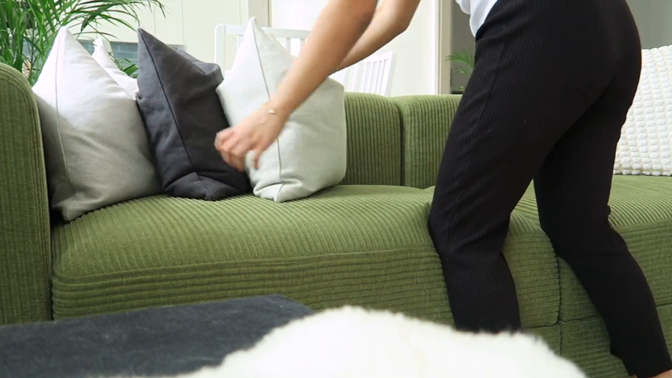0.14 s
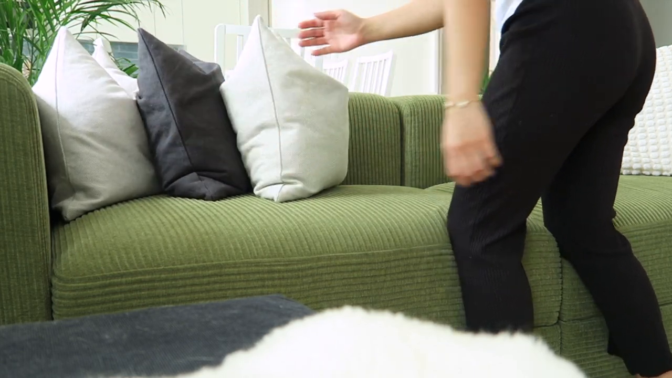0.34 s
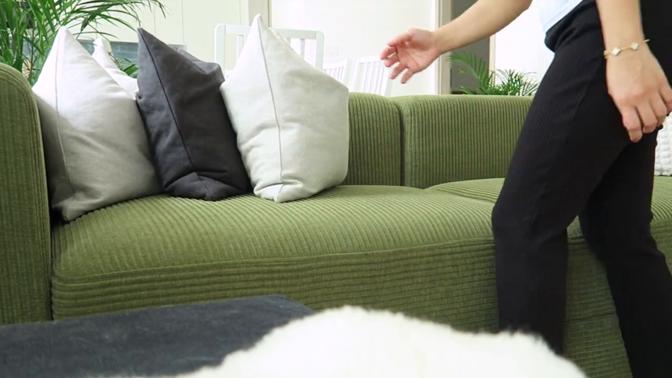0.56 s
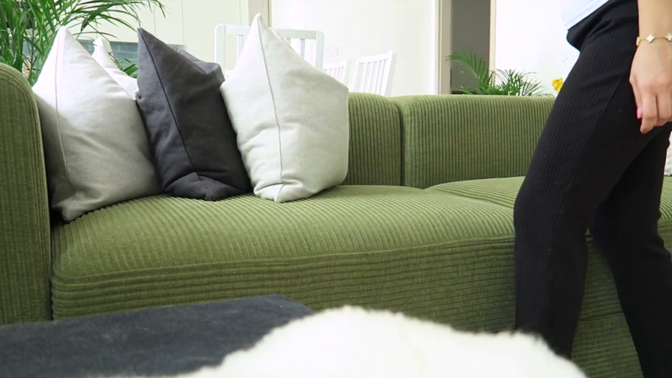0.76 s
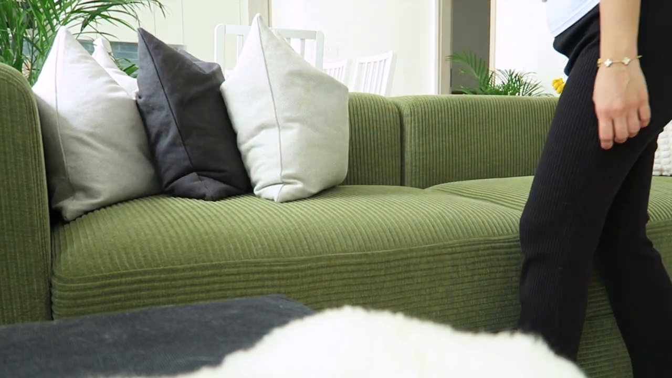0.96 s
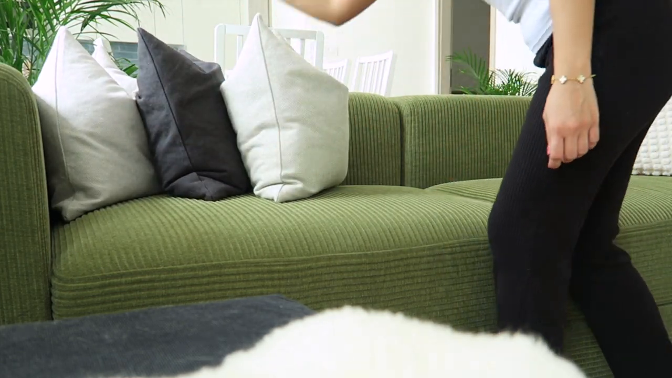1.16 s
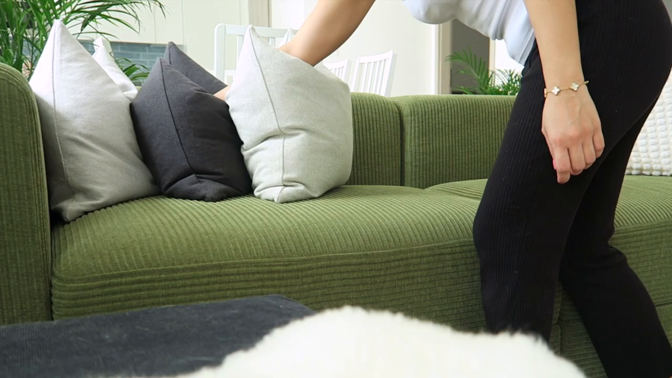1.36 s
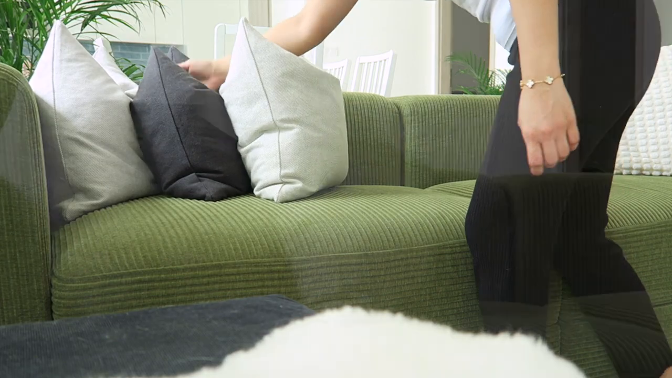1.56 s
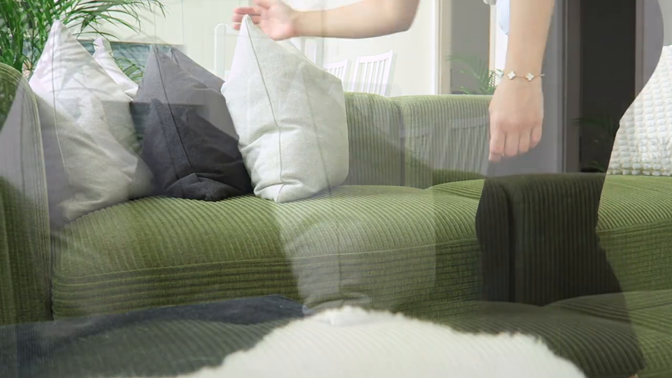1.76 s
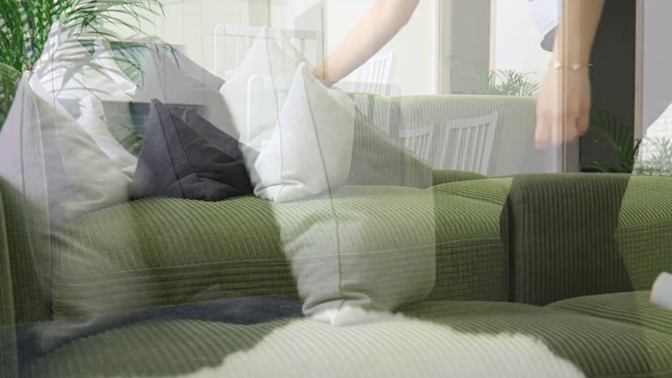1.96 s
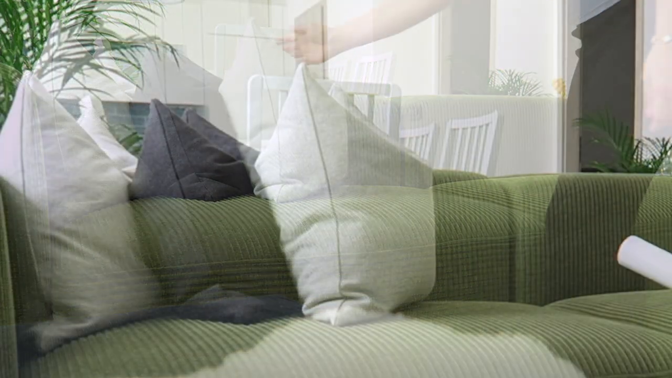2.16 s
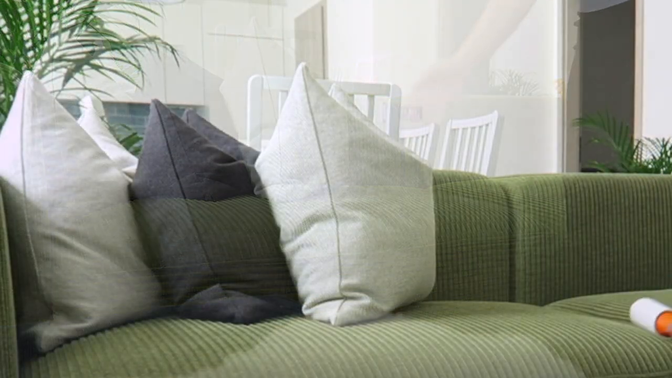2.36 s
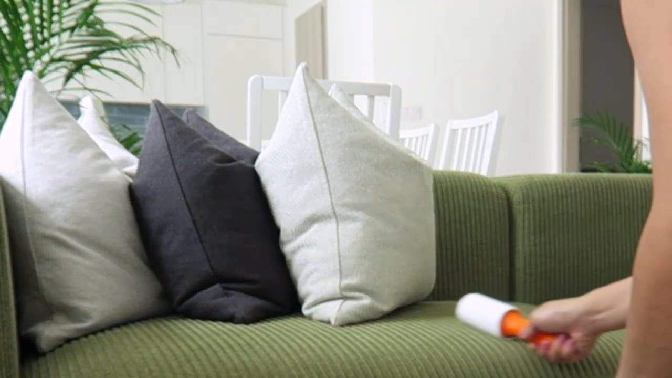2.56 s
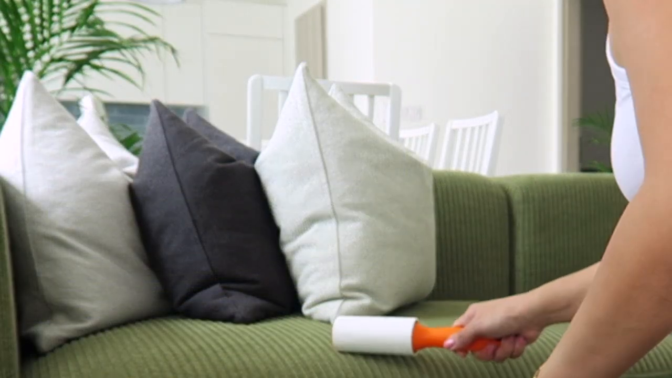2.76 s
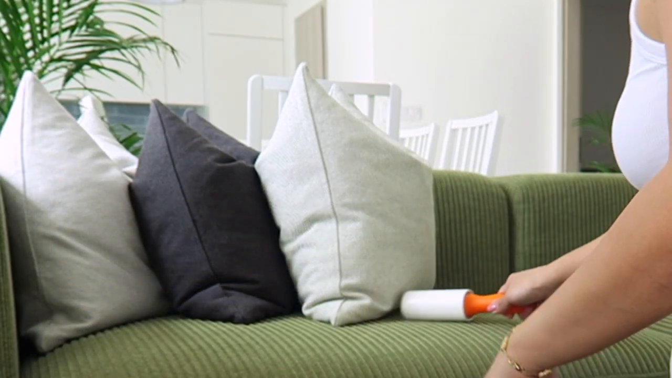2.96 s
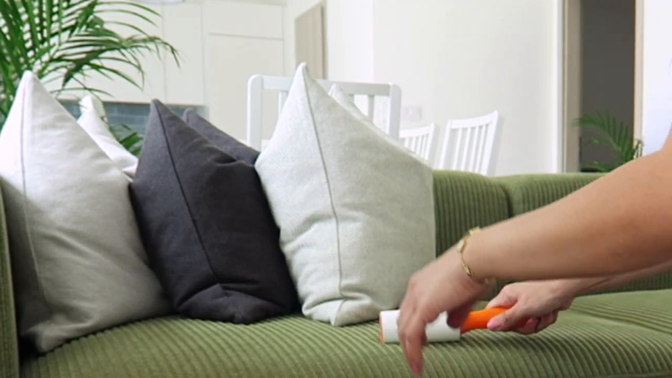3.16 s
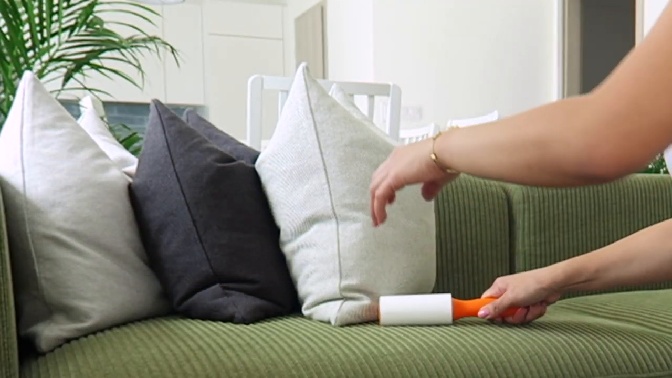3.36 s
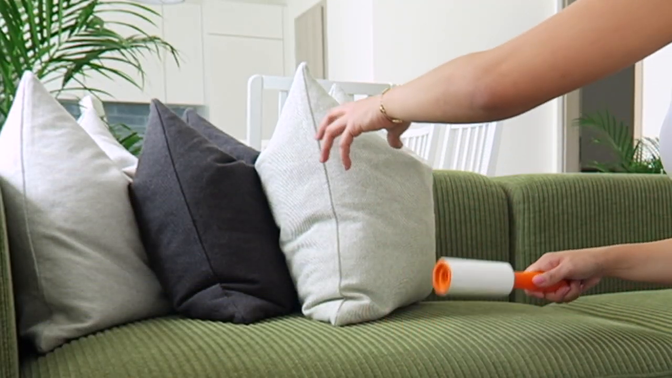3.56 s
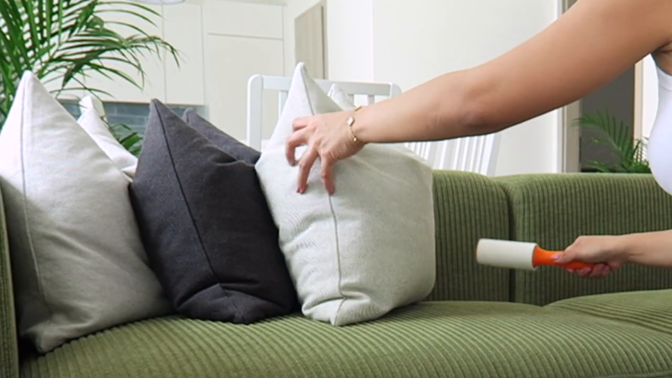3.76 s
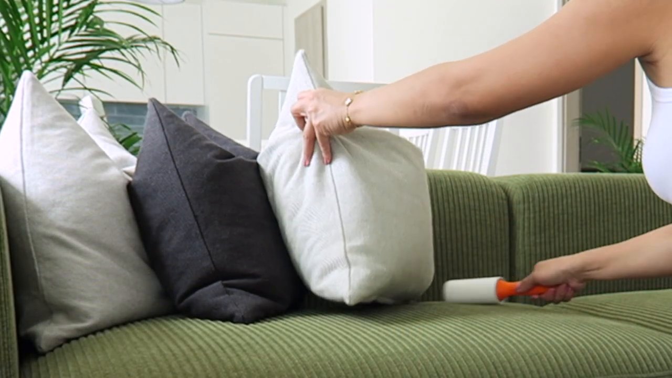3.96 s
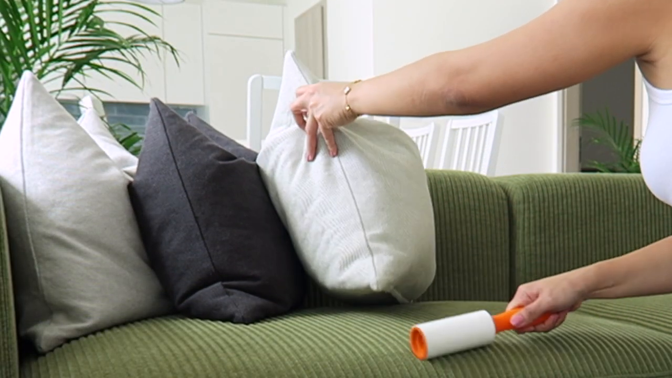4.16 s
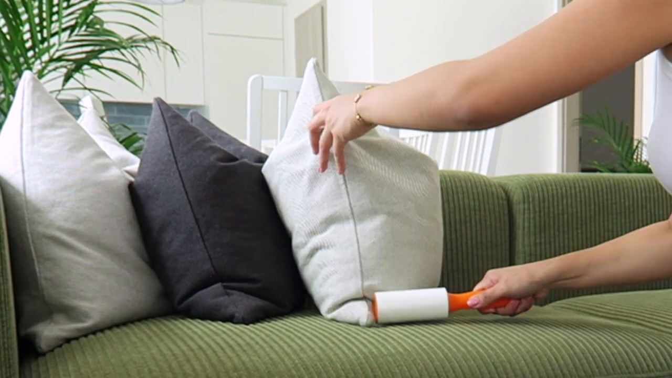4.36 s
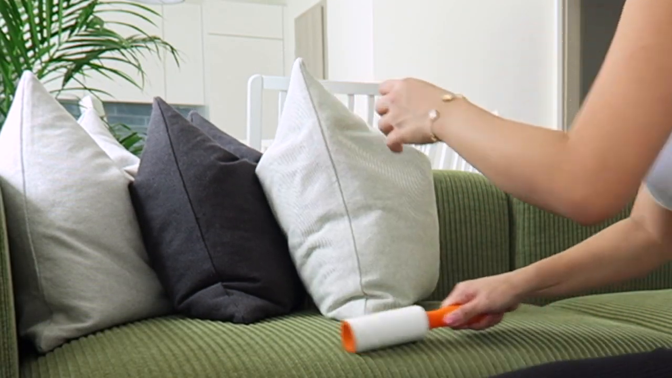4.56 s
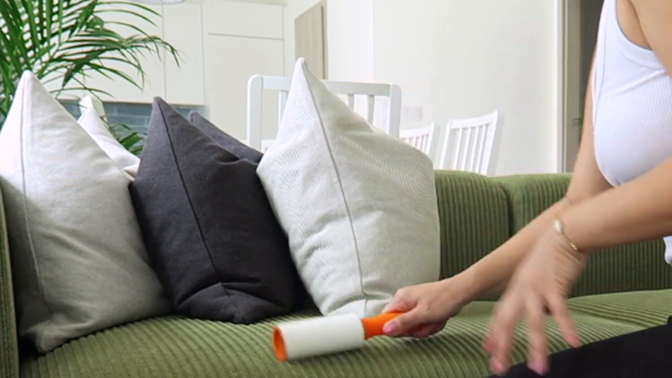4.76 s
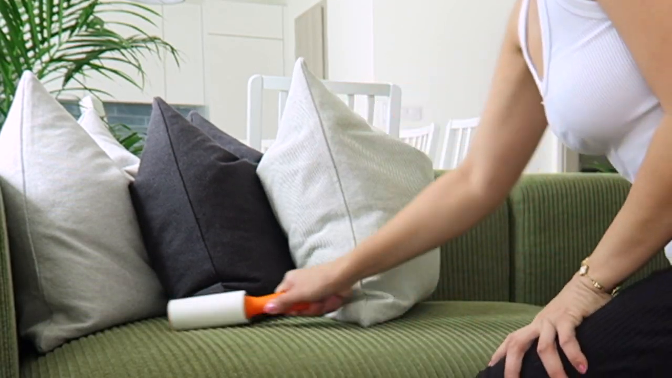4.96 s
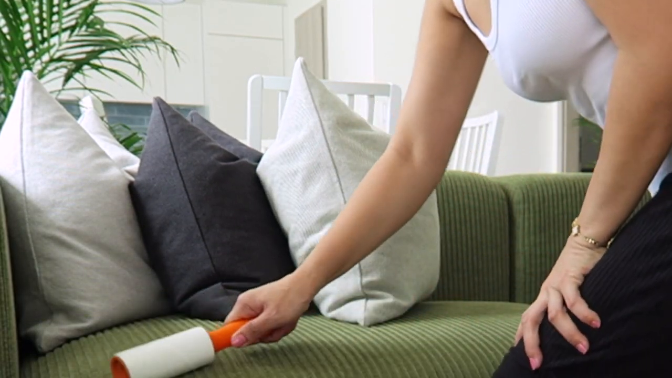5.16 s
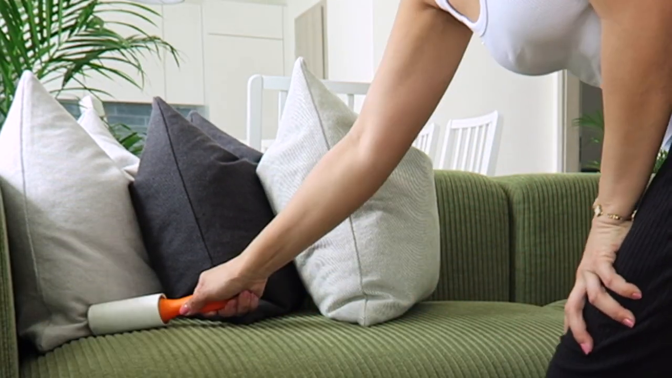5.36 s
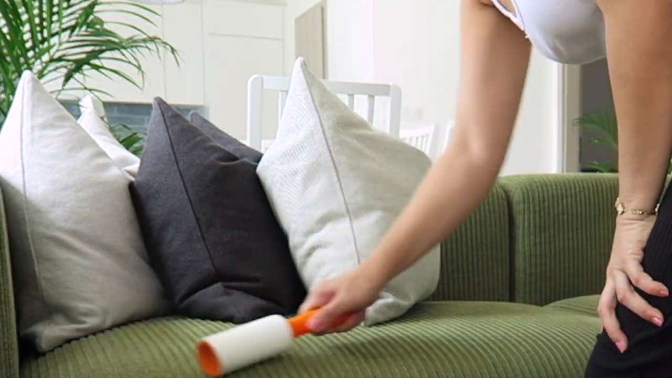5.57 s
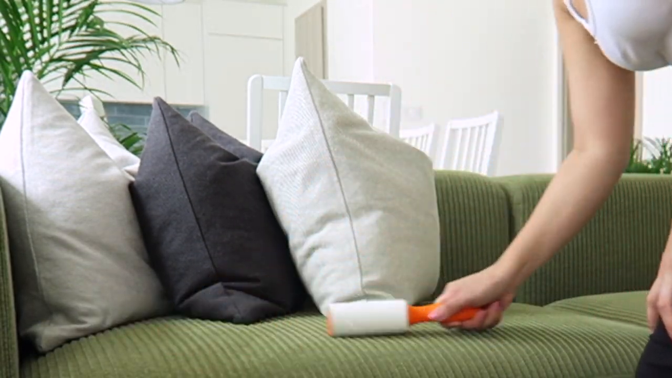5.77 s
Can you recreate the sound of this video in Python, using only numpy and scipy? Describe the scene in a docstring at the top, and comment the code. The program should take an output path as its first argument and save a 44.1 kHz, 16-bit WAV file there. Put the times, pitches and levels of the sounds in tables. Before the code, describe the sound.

A quiet furnished room with a faint low hush all round and a short soft tail; the handling is close and central. At 0 s a palm pats a cushion with a dull, padded thump and a lighter touch, followed by a slight cloth swish at 0.2. Very faint thin bracelet tinkles scatter from 0.3 to 1.3. At 1.33 comes the fullest pat, a slap with a boomy body; a weaker one lands at 2.0. From about 2.45 a sticky lint roller works corduroy in short to-and-fro strokes: crackly peeling, hollow drumming, breathy rib whirrs and low seat thuds. A very sharp plastic crack stands out at 2.68, with smaller clicks at 3.2 and 3.6. Strokes pause around 3.65-3.95, with a gentle cloth brush and a click with a knock. Rolling resumes near 4.0, grinding most firmly around 4.65, and continues in uneven strokes with clicks and hollow knocks to about 5.9.

```python
"""First a hand pats sofa cushions in a quiet living room: noise bursts slap and thump, sines boom.
Cloth brushes softly (swelling noise) and a bracelet tinkles faintly (short dying sines).
Then a sticky lint roller goes to and fro over corduroy: random grains make its tape peel and rasp and
its hollow core drum, whirr and grind on the ribs; rumbling noise and slow swings are the soft seat.
Its plastic handle clicks on the axle and its core knocks. A low hush of noise lies under it all."""
import sys
import numpy as np
from scipy import signal
from scipy.fft import rfft, irfft, next_fast_len
from scipy.io import wavfile

SR = 44100
rng = np.random.default_rng(int(sys.argv[2]) if len(sys.argv) > 2 else 0)


def store_wav(level_fs):
    """Save 16-bit WAV to argv[1]."""
    pcm = np.round(np.clip(np.atleast_2d(level_fs), -1, 1) * 32767)
    wavfile.write(sys.argv[1], SR, pcm.T.astype(np.int16))


N = 256662  # length in samples
T = np.arange(N) / SR  # time in seconds

# Event levels are set before the room, filters and extra level changes in the functions below.
# The hush of the house, its colour: [f/Hz, level/dB]
HUSH_COLOUR = [(15, -12), (33, -1), (47, -11), (80, -2.5), (125, -5), (160, -6.5), (300, -7), (600, -12.5),
               (900, -11), (1300, -15.5), (2100, -18), (4000, -24), (6000, -29.5), (9000, -36),
               (12500, -39.5), (15000, -52)]
# Faint drones in the hush: [f/Hz, width/Hz, lift/dB]
HUSH_DRONES = [(52.6, 9.7, 9.5), (414, 97, 6), (1014, 32, 8.5)]
# Small drop in the level of the hush, added to HUSH_DB: [t/s, level/dB]
HUSH_CHANGE = [(1.3, -0.5), (1.8, -2)]
HUSH_DB = -52
# How long the room's tail takes to fall by 60 dB: [f/Hz, t60/s]
ROOM_DECAY = [(80, 0.63), (210, 0.67), (560, 0.52), (1500, 0.61), (3900, 0.57), (10000, 0.4)]
# Filters on the side signal, which spreads the sound left and right: [f/Hz, level/dB]
HANDLING_WIDTH = [(50, -49), (110, -35), (200, -20), (380, -16.5), (700, -17), (1300, -21), (2600, -37),
                  (4400, -10), (8000, 0.5), (12000, -4)]
HUSH_WIDTH_BY_PITCH = [(40, -43), (110, 0), (220, 7.5), (500, 6), (1300, -1.5), (15000, 1)]

# Pats on a cushion, timed by the palm; each touch below shifts the levels and scales the spot's pitch:
# [t/s, slap level/dB, thump level/dB, boom level/dB, contact time/s, spot's favoured f/Hz]
CUSHION_PATS = [(0.002, -35.5, -34.5, -25.5, 0.022, 215), (0.046, -44.5, -50, -41, 0.015, 300),
                (1.3318, -23, -26, -22.5, .0165, 142), (1.976, -37.5, -39, -38, 0.00792, 266)]
# Parts of every pat (fingers, palm, heel of the hand, cushion settling): [delay/contact times,
# rise/s, slap level/dB, thump level/dB, boom level/dB, ratio to the spot's f]
PAT_TOUCHES = [(-0.73, 0.0012, -3, -2.5, -7, 0.93), (0, 0.00014, -4.5, 1, -3.5, 0.79),
               (.6, 0.00021, -14.5, -0.5, -31, 0.63), (1.6, 0.002, -19, -23.5, -3.5, 2.1)]
# What a patted cushion on the sofa rings with: [f/Hz, level/dB, t60/s]
CUSHION_MODES = [(140, 6, 0.1), (179.7, -4, 0.55), (208.2, 3, 0.27), (296.7, -4, 0.22), (421.6, -5, 0.175),
                 (586, -5, 0.11), (828, -4, 0.18), (978, 3, 0.12)]
# Colours of the slap on the cover and the thump of the filling: [f/Hz, level/dB]
SLAP_COLOUR = [(100, -14), (400, 1), (780, 0.5), (1050, 2.5), (1400, -1), (2100, 2.5), (3000, -1),
               (4000, -9), (6000, -17), (9000, -26.5), (15000, -30)]
THUMP_COLOUR = [(25, 3), (50, 15), (90, 13), (140, 0), (300, 8.5), (480, 4.5), (800, 0), (1500, -4),
                (4000, -44)]
# Resonances of the taut cushion cover: [f/Hz, width/Hz, lift/dB]
COVER_RESONANCES = [(795, 90, 1), (950, 100, -14), (1090, 170, -1.5), (1427, 120, 8.5), (1735, 310, 7)]
# The soft seat gives way, timed by its widest swing: [t/s, level/dB, f/Hz, cycles to the widest swing]
SEAT_THUDS = [(0.008, -26.5, 137, 2.07), (0.07, -32.5, 230, 2.4), (0.111, -30, 182, 1.7),
              (1.996, -34.5, 199, 2.1), (2.461, -29, 78.5, 0.92), (2.753, -26.5, 127, 1.82),
              (2.986, -30.5, 88, 0.84), (3.411, -35, 109, 1.2), (4.088, -29.5, 81.5, 1.5),
              (4.172, -25, 99, 0.84), (4.412, -30, 85, 1.05), (4.68, -26.5, 270, 2.88),
              (4.709, -29, 126, 1.4), (4.753, -27.5, 98, 1), (4.785, -34, 35.8, 1), (5.5, -31.5, 92, 1.07),
              (5.602, -26, 85.5, 1.05)]
# Cloth brushing, timed by its peak: [t/s, level/dB, time from the peak to 17 dB down/s]
CLOTH_BRUSHES = [(0.192, -48, 0.04), (0.51, -58, 0.064), (1.58, -54.5, 0.074), (3.88, -49, 0.21)]
# Colour of brushing cloth: [f/Hz, level/dB]
CLOTH_COLOUR = [(60, 12), (200, 9), (450, 5), (800, 0), (1400, -1), (2800, 0), (4200, -6), (7000, -20),
                (12000, -22), (15000, -38)]
# Bracelet links touching: [t/s, level/dB]
LINK_TOUCHES = [(0.311, -55), (0.688, -53), (0.703, -54), (0.72, -58), (0.737, -56), (0.754, -59),
                (0.797, -57), (0.821, -54), (0.853, -59), (0.951, -57), (0.97, -61), (0.984, -60),
                (1.003, -56), (1.032, -55), (1.053, -54), (1.087, -58), (1.185, -56), (1.217, -58),
                (1.236, -57), (1.27, -56), (1.297, -60), (1.769, -60), (1.8, -62)]
# The ring of one link: [f/Hz, level/dB, t60/s]
LINK_RING = [(4200, 5, 0.021), (5200, -1, 0.02), (3800, 5, .012)]

# Roller strokes, to and fro: [start t/s, length/s, fastest point as a share of the length,
# speed level/dB, weight level/dB, extra fizz level from the nap/dB]
ROLLER_STROKES = [(2.453, 0.12, 0.7, -39, -35, -3), (2.579, 0.19, 0.38, -35.5, -34, 1),
                  (2.852, 0.28, 0.56, -46, -42, 5), (2.973, 0.084, 0.38, -37.5, -38, 4),
                  (3.134, 0.1, 0.53, -36.5, -34, -2), (3.29, 0.097, 0.39, -37, -34, 1),
                  (3.447, 0.089, 0.12, -39.5, -38, 0), (3.526, 0.13, 0.067, -57, -50.5, 16),
                  (3.97, 0.027, 0.99, -39, -36.5, -2), (4.041, 0.2, 0.42, -40, -36, 2.5),
                  (4.284, 0.13, 0.8, -38.5, -38, 5), (4.45, 0.29, 0.79, -42, -35.5, 3),
                  (4.77, 0.32, 0.7, -43.5, -33.5, 6.5), (5.127, .11, 0.34, -42.5, -34.5, 3.5),
                  (5.297, 0.064, 0.4, -38, -41.5, 1), (5.339, 0.11, 0.7, -42, -33, 5),
                  (5.488, 0.16, 0.68, -40.5, -37.5, 0.5), (5.678, 0.2, 0.49, -40.5, -35, 2.5)]
# Colours of peeling, of the drumming core, of the pushed seat and of the fizz: [f/Hz, level/dB]
PEEL_COLOUR = [(300, -17), (800, 5.5), (1300, 0), (1900, 2), (2600, 0), (3300, -3), (4200, -8.5),
               (5500, -17.5), (8000, -24), (12000, -65)]
DRUM_COLOUR = [(70, -12), (130, 9.5), (165, -25), (205, 5.5), (280, -1.5), (420, 0), (600, 0.5), (950, -6),
               (1300, -6.5), (2200, -14.5), (5000, -33)]
SEAT_COLOUR = [(18, -15), (35, -1), (55, -1.5), (78, 6.5), (105, 2.5), (130, 4), (165, -11), (300, -28),
               (700, -61)]
FIZZ_COLOUR = [(2500, -9), (4500, 13), (7000, 5), (9500, 1.5), (11500, 10.5), (12600, 5.5), (13700, -10),
               (15200, -17)]
# Resonances of the roller on the seat: [f/Hz, width/Hz, lift/dB]
ROLLER_RESONANCES = [(133, 12, 2), (198, 29, 7), (296, 9.7, 9), (385, 140, 8.5), (557, 37, 6), (711, 32, 7),
                     (922, 76, 7.5)]
# The roller gets going, runs out, and is quieter away from its fastest point
STROKE_ATTACK_S, STROKE_RELEASE_S, SLOWING_DB = 0.0081, 0.037, 7
# The seat takes the weight before the roller moves and is slower to let go
SEAT_LEAD_S, SEAT_RELEASE_S, EASING_DB = 0.0076, 0.11, 8.5
# The fizz swells in one arch and dies where the roller turns round; the second number is a power
FIZZ_RUN_OUT_S, FIZZ_ARCH = 0.029, 0.36
# Level of each layer against the stroke
PEEL_DB, TUFT_DB, FIZZ_DB, DRUM_DB, SEAT_DB = -2, -14, -22, -3, -3

# Cracks of the axle; the ring level is against the crack, before the modes' own levels:
# [t/s, crack level/dB, f/Hz, half length of the crack/cycles, ring level/dB]
AXLE_CLICKS = [(2.467, -28, 2800, 0.82, -11), (2.6815, -2, 3120, 0.7, -9.5), (3.153, -20, 2500, 1.2, -16),
               (3.189, -10, 2400, 0.49, -9), (3.5928, -19, 1880, 0.45, -13), (3.7618, -30, 2900, 1.3, 9),
               (3.989, -21, 2100, 0.3, -18), (4.0843, -17.5, 2050, 0.83, -11),
               (4.788, -26, 2350, 0.28, -11), (4.8573, -19, 2200, 0.31, -0.5),
               (5.1387, -11.5, 2150, 0.55, -11.5), (5.31, -10.5, 2600, 0.17, -12),
               (5.4354, -26, 2300, 1.4, -13), (5.4844, -21, 3020, 1.4, -11), (5.511, -26, 1600, 0.51, -14),
               (5.6725, -21.5, 1900, 0.37, -9), (5.804, -13.5, 3250, 1.0, -10)]
# The plastic handle's ring: [f/Hz, level/dB, t60/s]
HANDLE_RING = [(1094, -17, 0.044), (1410, -13, .018), (1940, -23, 0.014), (2600, -26.5, 0.015),
               (2930, -6.5, 0.016), (3420, -3, 0.015), (4050, -12, 0.017)]
# Whirrs across the ribs: [start t/s, length/s, level/dB, first f/Hz, last f/Hz]
RIB_WHIRRS = [(2.524, 0.12, -40, 336, 450), (2.907, .1, -49, 604, 730), (3.273, 0.12, -43, 545, 745),
              (3.445, 0.055, -54, 393, 476), (4.611, 0.14, -33.5, 590, 484), (4.674, 0.095, -38, 946, 865),
              (4.898, 0.13, -38.5, 540, 617), (5.022, .07, -43, 980, 1100), (5.485, 0.036, -40.5, 626, 540),
              (5.58, 0.036, -34, 567, 636)]
# Firm pushes that grind the ribs against the foam, timed by their peak:
# [t/s, level/dB, time from the peak to 17 dB down/s, brightness/dB per octave]
FIRM_PUSHES = [(2.592, -33, 0.14, 0.5), (2.706, -39.5, 0.043, 10), (3.174, -37.5, 0.022, 1),
               (3.48, -37, 0.039, 5.5), (4.174, -34, 0.096, -3.5), (4.647, -32, 0.063, 6),
               (4.682, -28, 0.047, 1), (4.803, -33.5, 0.027, 6.5), (4.995, -33, 0.13, 0),
               (5.408, -44, 0.035, -8), (5.504, -34.5, 0.02, -3), (5.61, -35.5, 0.044, 5),
               (5.77, -38.5, 0.056, 1.5)]
# Colour of the grinding: [f/Hz, level/dB]
GRIND_COLOUR = [(80, -39), (128, 15.5), (160, 3.5), (250, 8.5), (370, 1.5), (480, -4), (650, -11),
                (1000, -13), (1500, -13), (3000, -53)]
# The tape rasps as it tears free: [start t/s, length/s, level/dB, centre f/Hz]
TAPE_RASPS = [(2.661, 0.052, -42, 1880), (4.3, 0.1, -44, 3270), (4.334, 0.094, -45, 1920),
              (4.62, 0.097, -46.5, 1480), (5.303, 0.025, -44, 2570), (5.423, 0.029, -39, 2350),
              (5.692, 0.027, -45, 1500), (5.75, 0.026, -50, 2330)]
# Knocks of the hollow core: [t/s, level/dB, f/Hz, t60/s]
CORE_KNOCKS = [(3.153, -37, 620, .015), (3.7617, -33.5, 1240, 0.012), (4.0837, -24.5, 1770, 0.013),
               (4.786, -28, 950, 0.02), (5.3095, -38, 795, 0.0065), (5.4832, -26, 553, 0.017),
               (5.584, -22, 750, .012), (5.6708, -36, 1000, .008)]


def amp(db):
    """Turns decibels into gain."""
    return 10 ** (np.asarray(db) / 20)


def unit(x):
    """Scales a sound so that its average strength (rms) is 1."""
    return x / np.sqrt(np.mean(x ** 2) + 1e-20)


def read(points, hz):
    """Reads between a table's points, with pitch on a log scale."""
    f, value = np.transpose(points)
    return np.interp(np.log(hz + 1), np.log(f), value)  # the 1 avoids the log of zero


def tint(x, points):
    """Colours a sound: each frequency is made louder or softer by a table of (Hz, dB)."""
    size = next_fast_len(N + 8192, True)
    gain = amp(read(points, np.fft.rfftfreq(size, 1 / SR)))
    return irfft(rfft(x, size) * gain, size)[..., :N]


def lifts(peaks):
    """Turns resonances (Hz, width Hz, dB) into a smooth table of humps and dips (Hz, dB)."""
    hz = np.geomspace(50, 2000, 800)
    humps = sum(db / (1 + (2 * (hz - f) / width) ** 2) for f, width, db in peaks)
    return np.transpose([hz, humps])


def hiss(points):
    """Coloured noise of rms 1, as mid and side."""
    return unit(tint(rng.standard_normal((2, N)), points))


def wander(hz):
    """A smooth random curve of rms 1 that changes about hz times a second."""
    smooth = 1 / (1 + (np.fft.rfftfreq(N, 1 / SR) / hz) ** 4)
    return unit(irfft(rfft(rng.standard_normal(N)) * smooth, N))


def grains(per_s, spread_db):
    """Tiny random impulses, as mid and side; a spread away from 0 makes their sizes uneven."""
    size = amp(spread_db * np.minimum(rng.exponential(1, (2, N)), 4))
    sign = rng.choice([-1, 1], (2, N))
    present = rng.random((2, N)) < per_s / SR
    return size * sign * present


def ring(modes, t):
    """A struck thing rings: one sine for each mode, dying by 60 dB in its t60."""
    return sum(amp(db - 60 * t / t60) * np.sin(2 * np.pi * hz * t) for hz, db, t60 in modes)


def resonate(x, hz, width):
    """A resonance of gain 1 whose pitch follows the curve hz."""
    turn = np.exp(2j * np.pi * np.cumsum(hz * np.ones(len(x))) / SR)
    r = np.exp(-np.pi * width / SR)
    # shift the pitch down to zero, smooth there, and shift it back up
    return 2 * (turn * signal.lfilter([1 - r], [1, -r], x / turn)).real


def swells(rows):
    """Smooth rises and falls around a peak, from rows of (s, dB, length s)."""
    return sum(amp(db) * np.exp(-((T - s) / length) ** 2 * 2) for s, db, length in rows)


def add(mix, s, sound):
    """Adds a sound at time s; what falls before time zero is dropped."""
    at = round(s * SR)
    sound = sound[max(-at, 0):]
    part = mix[max(at, 0):][:len(sound)]
    part += sound[:len(part)]


def room(x, wet_db, build_s=0.0044, turn_s=0.016, count=3):
    """Adds the room's dying noise tail, blended in turn from several random tails."""
    t, out = T[:SR], x
    for k in range(count):
        share = np.sqrt(np.maximum(1 - abs((T / turn_s + k) % count - 1), 0))  # the powers sum to 1
        noise = rng.standard_normal((2, SR)) * (1 - np.exp(-(t / build_s) ** 2))
        hz, at, z = signal.stft(noise, SR, nperseg=256)
        decay = amp(-60 * at / read(ROOM_DECAY, hz)[:, None])
        tail = signal.istft(z * decay, SR, nperseg=256)[1]
        tail = tail / np.linalg.norm(tail[0])
        # only the mid feeds the tail, which has a mid and a side of its own
        out = out + amp(wet_db) * signal.fftconvolve(x[:1] * share, tail, axes=1)[:, :N]
    return out


def dapple(x, patchy_db, patch_hz, patch_s):
    """Lifts and lowers random patches of time and frequency, so that the colour keeps shifting."""
    z = signal.stft(x, SR, nperseg=256, noverlap=192)[2]
    across = np.fft.fftfreq(z.shape[1], SR / 256)[:, None]
    along = np.fft.fftfreq(z.shape[2], 64 / SR)
    smooth = np.exp(-(across * patch_hz) ** 2 - (along * patch_s) ** 2)
    patches = np.fft.ifft2(np.fft.fft2(rng.standard_normal(z.shape[1:])) * smooth).real
    gain = unit(amp(patchy_db * unit(patches)))
    return signal.istft(z * gain, SR, nperseg=256, noverlap=192)[1][:, :N]


def room_tone():
    """The low hush of the house: coloured noise with faint drones, whose level dips a little on the way."""
    level_db = HUSH_DB + np.interp(T, *np.transpose(HUSH_CHANGE))
    return amp(level_db) * unit(tint(hiss(HUSH_COLOUR), lifts(HUSH_DRONES)))


def pats(boom_rise_s=0.00014, aim_db=7):
    """A hand slaps the cover, squeezes air from the filling, and sets the cushion booming."""
    slap, thump, boom, t = np.zeros(N), np.zeros(N), np.zeros((2, N)), T[:SR // 2]
    for s, slap_db, thump_db, boom_db, contact, spot_hz in CUSHION_PATS:
        for delay, rise_s, part_slap_db, part_thump_db, part_boom_db, ratio in PAT_TOUCHES:
            at = s + delay * contact
            press = (1 - np.exp(-t / rise_s)) * np.exp(-t / contact)
            add(slap, at, amp(slap_db + part_slap_db) * press)
            add(thump, at, amp(thump_db + part_thump_db) * press)
            # modes weaken with each octave away from the pitch that the spot favours
            modes = [(hz, db - aim_db * abs(np.log2(hz / (spot_hz * ratio))), t60)
                     for hz, db, t60 in CUSHION_MODES]
            boom_rise = 1 - np.exp(-t / (boom_rise_s + rise_s))
            add(boom[0], at, amp(boom_db + part_boom_db) * ring(modes, t) * boom_rise)
    cover = tint(grains(per_s=4000, spread_db=3.5), SLAP_COLOUR)
    cover = unit(tint(cover, lifts(COVER_RESONANCES)))
    smack = room(slap * cover + thump * hiss(THUMP_COLOUR), wet_db=-4.0)
    return dapple(smack, patchy_db=1.44, patch_hz=500, patch_s=0.023) + room(boom, wet_db=-10.5)


def thuds():
    """The foam seat gives under a pat, or as the roller lands or pushes, in a few slow swings."""
    out, t = np.zeros((2, N)), T[:SR // 3]
    for s, db, hz, swell_cycles in SEAT_THUDS:
        swell_s = swell_cycles / hz
        swell = t / swell_s * np.exp(1 - t / swell_s)  # peaks at 1 after swell_s
        add(out[0], s - swell_s, amp(db) * swell * np.sin(2 * np.pi * hz * t))
    return out


def clothes(uneven_db=3):
    """Clothes and cushion covers brush in short soft swishes of uneven noise."""
    return room(swells(CLOTH_BRUSHES) * amp(uneven_db * wander(31)) * hiss(CLOTH_COLOUR), wet_db=-5.5)


def bracelet(rise_s=0.00056):
    """Small links touch softly, each with the same thin ring."""
    out, t = np.zeros((2, N)), T[:4000]
    link = ring(LINK_RING, t) * (1 - np.exp(-t / rise_s))
    for s, db in LINK_TOUCHES:
        add(out[0], s, amp(db) * link)
    return room(out, wet_db=-18)


def stroke(start, length, crest, release_s, slope_db):
    """Gain of one stroke: a quick attack, a climb to its crest and a fall from it, then a release."""
    t = T - start
    attack = np.clip(t / STROKE_ATTACK_S, 0, 1)
    hold = amp(-slope_db * abs(np.clip(t / length, 0, 1) - crest))
    return attack * hold * np.exp(-np.maximum(t - length, 0) / release_s)


def arm():
    """Gains of peeling, fizz, drumming and weight on the seat; overlapping strokes add in power."""
    power = np.zeros((4, N))
    for s, length, crest, speed_db, weight_db, nap_db in ROLLER_STROKES:
        roll = stroke(s, length, crest, STROKE_RELEASE_S, SLOWING_DB)
        lean = stroke(s - SEAT_LEAD_S, length, crest, SEAT_RELEASE_S, EASING_DB)
        progress = np.clip((T - s) / (length + FIZZ_RUN_OUT_S), 0, 1)
        arch = abs(np.sin(np.pi * progress)) ** FIZZ_ARCH
        power += np.square([amp(speed_db) * roll, amp(speed_db + nap_db) * arch,
                            amp(weight_db) * roll, amp(weight_db) * lean])
    return np.sqrt(power)


def roller(tack_db=1.5, ribs_db=2):
    """Fibres snap off the tape singly and in tufts, ribs bump the core, and the pushed seat rumbles."""
    speed, fizz, drum, weight = arm()
    tack = unit(amp(tack_db * wander(80)))  # fibres come off in clumps
    fibres = amp(PEEL_DB) * tack * unit(tint(grains(per_s=3200, spread_db=0.0), PEEL_COLOUR))
    tufts = amp(TUFT_DB) * unit(tint(grains(per_s=170, spread_db=-1.5), PEEL_COLOUR))
    bumps = amp(ribs_db * wander(40)) * grains(per_s=1500, spread_db=2.5)
    core = unit(tint(tint(bumps, DRUM_COLOUR), lifts(ROLLER_RESONANCES)))
    core = amp(DRUM_DB) * drum * core
    pile = unit(tack * tint(grains(per_s=9000, spread_db=-4.5), FIZZ_COLOUR))
    pile = amp(FIZZ_DB) * fizz * pile
    seat = amp(SEAT_DB) * weight * unit(tint(hiss(SEAT_COLOUR), lifts(ROLLER_RESONANCES)))
    rolling = room(speed * (fibres + tufts) + core, wet_db=-5.0)
    return dapple(rolling, patchy_db=2.0, patch_hz=700, patch_s=0.034) + pile + seat


def axle(aim_db=4, scatter_db=5.5, echo_s=0.009, echo_db=-12):
    """The plastic spool cracks against its handle, which rings briefly; a near surface echoes it."""
    out, lead_s = np.zeros((2, N)), 0.001  # the crack starts this long before its peak
    t = T[:2000] - lead_s
    for s, db, hz, cycles, ring_db in AXLE_CLICKS:
        crack = amp(db) * np.exp(-(t * hz / cycles) ** 2) * np.cos(2 * np.pi * hz * t)
        # modes far from the crack's pitch ring less, and luck changes each one
        luck = rng.standard_normal(len(HANDLE_RING))
        modes = [(f, mode_db - aim_db * abs(np.log2(f / hz)) + scatter_db * chance, t60)
                 for (f, mode_db, t60), chance in zip(HANDLE_RING, luck)]
        click = crack + amp(db + ring_db) * ring(modes, np.maximum(t, 0))
        add(out[0], s - lead_s, click)
        add(out[0], s - lead_s + echo_s, amp(echo_db) * click)
    duller = [(3400, -6.5), (4400, -3.5), (5600, -4), (8000, -16), (12000, -34)]  # f/Hz, level/dB
    return room(tint(out, duller), wet_db=-16.0)


def whirrs(width_hz=120, taper=0.52):
    """Rib bumps pass a moving resonance: a breathy pitch glides evenly from a first to a last frequency."""
    out = np.zeros((2, N))
    bumps = grains(per_s=1900, spread_db=-1.5)[0]
    for s, length, db, from_hz, to_hz in RIB_WHIRRS:
        part = bumps[round(s * SR):][:round(length * SR)]
        hz = np.linspace(from_hz, to_hz, len(part))
        tone = resonate(resonate(part, hz, width_hz), hz, width_hz)
        add(out[0], s, amp(db) * unit(tone) * signal.windows.tukey(len(part), taper))
    return room(out, wet_db=-7)


def grinds():
    """Under weight the ribs slip in dense bumps and the padded seat answers with a hollow rub."""
    slips = grains(per_s=2400, spread_db=2.5)
    rub, out = tint(tint(slips, GRIND_COLOUR), lifts(ROLLER_RESONANCES)), np.zeros((2, N))
    for s, db, length, tilt in FIRM_PUSHES:
        slope = [(150, 0), (1200, tilt * np.log2(1200 / 150))]
        out += swells([(s, db, length)]) * unit(tint(rub, slope))
    return room(out, wet_db=-5.5)


def rasps(width_hz=1500, slips_per_s=230, slip_share=0.65, uneven=0.42, taper=0.4):
    """The tape tears free in quick uneven slips, each a tiny burst of snapping fibres."""
    out = np.zeros((2, N))
    slips = np.cumsum(slips_per_s * np.exp(uneven * wander(90))) / SR  # slips counted so far
    tear = np.exp(-(slips % 1) / slip_share) * grains(per_s=11000, spread_db=3.0)[0]
    for s, length, db, hz in TAPE_RASPS:
        part = tear[round(s * SR):][:round(length * SR)]
        rasp = resonate(resonate(part, hz, width_hz), hz, width_hz)
        add(out[0], s, amp(db) * unit(rasp) * signal.windows.tukey(len(part), taper))
    return room(tint(out, [(500, -5), (1400, 5.0), (4200, -2.0), (6000, -12)]), wet_db=-8)


def knocks():
    """The hollow core knocks on its spindle, each time with one dying sine."""
    out = np.zeros((2, N))
    for s, db, hz, t60 in CORE_KNOCKS:
        add(out[0], s, ring([(hz, db, t60)], T[:3000]))
    return room(out, wet_db=-5)


def scene():
    """The handling is nearly central, its treble wider; the hush comes from all round."""
    far = room_tone()
    near = pats() + thuds() + clothes() + bracelet()
    near = near + roller() + axle() + whirrs() + grinds() + rasps() + knocks()
    mid = near[0] + far[0]
    side = tint(near[1], HANDLING_WIDTH) + tint(far[1], HUSH_WIDTH_BY_PITCH)
    return np.array([mid + side, mid - side])  # left and right


def record(dry):
    """Limits the band: a smooth low-pass filter takes away the highest treble."""
    low_pass = signal.firwin(511, 15200, window=("kaiser", 9), fs=SR)  # cutoff in Hz
    return signal.oaconvolve(dry, low_pass[None], "same")


dry = scene()
out = record(dry)
store_wav(out)
```